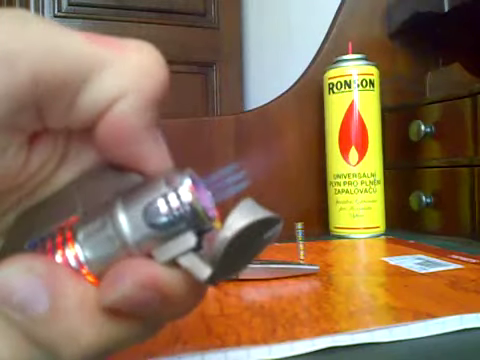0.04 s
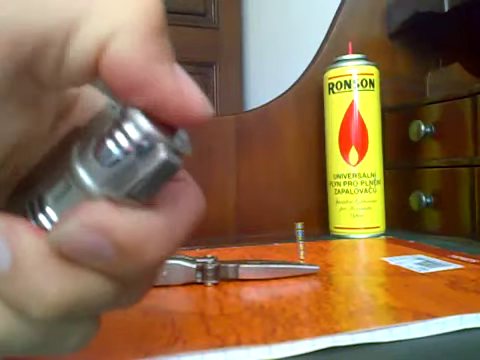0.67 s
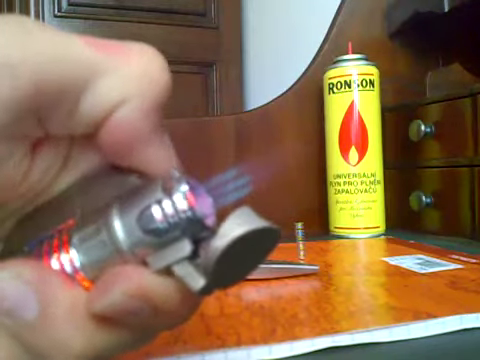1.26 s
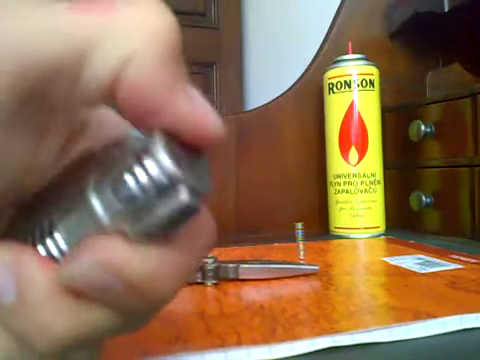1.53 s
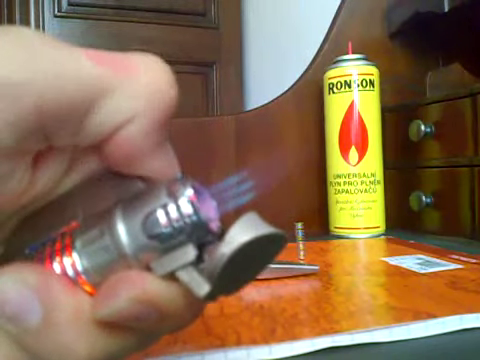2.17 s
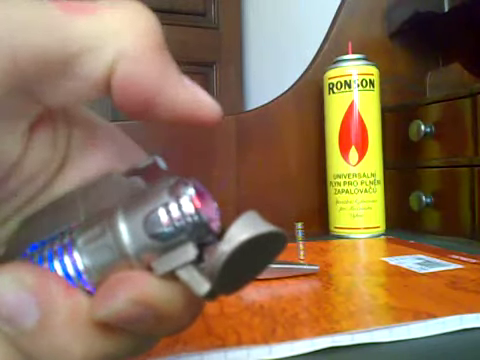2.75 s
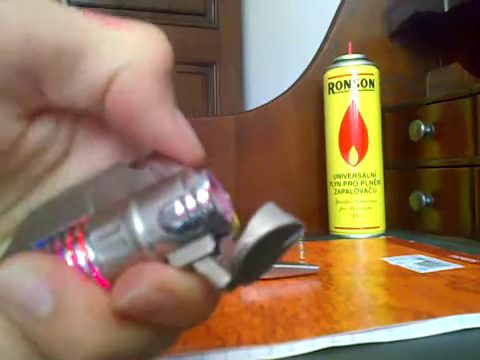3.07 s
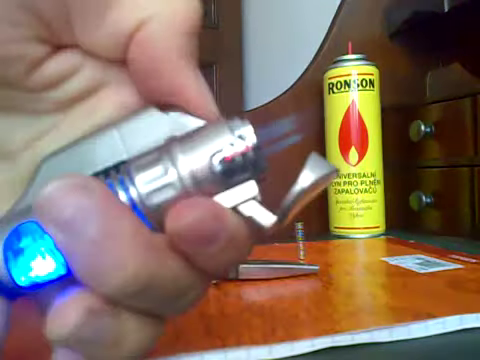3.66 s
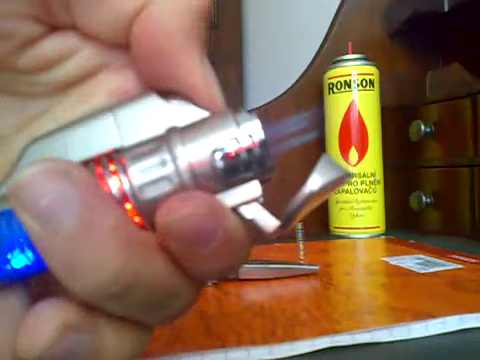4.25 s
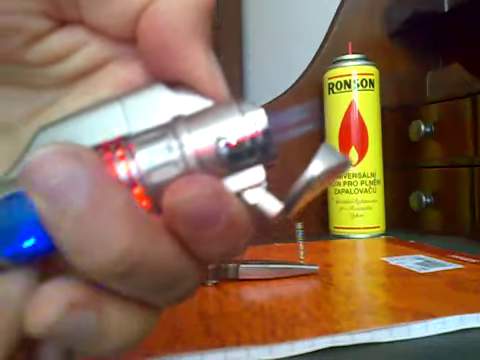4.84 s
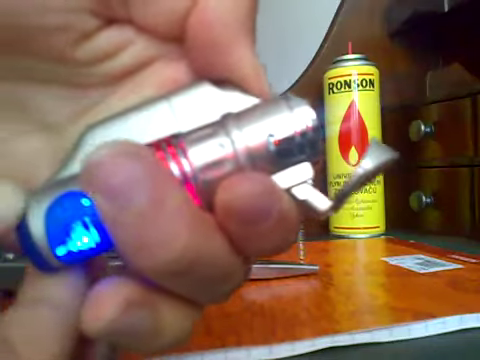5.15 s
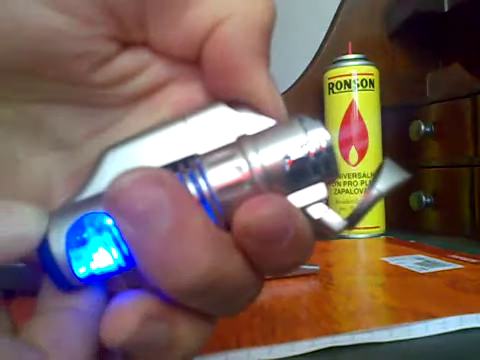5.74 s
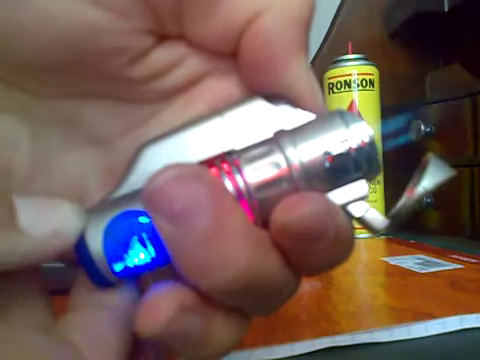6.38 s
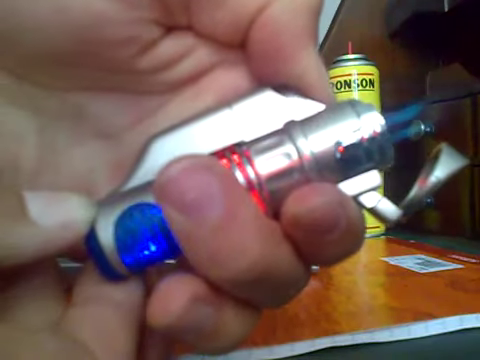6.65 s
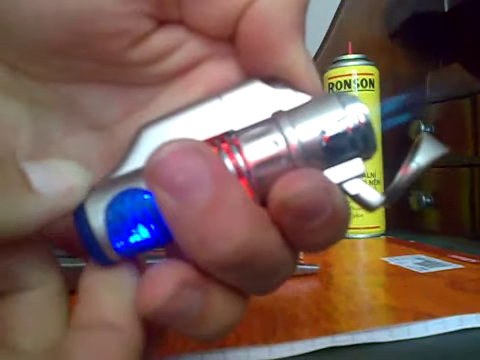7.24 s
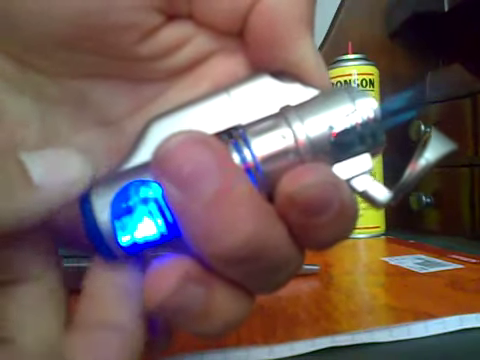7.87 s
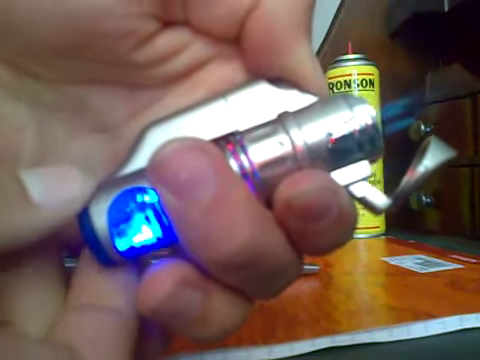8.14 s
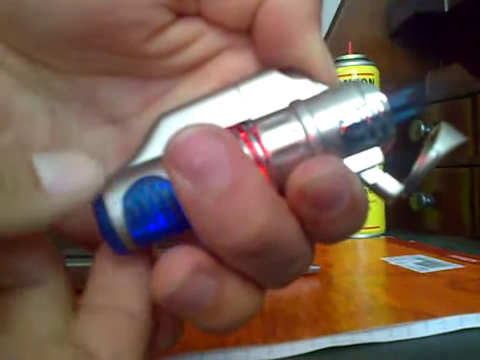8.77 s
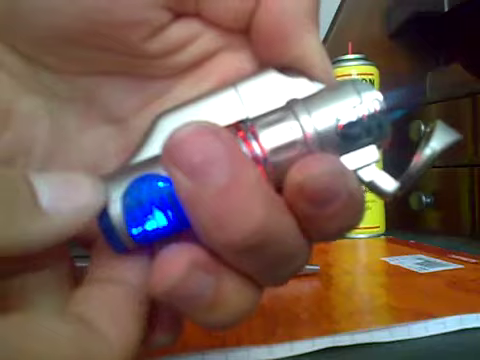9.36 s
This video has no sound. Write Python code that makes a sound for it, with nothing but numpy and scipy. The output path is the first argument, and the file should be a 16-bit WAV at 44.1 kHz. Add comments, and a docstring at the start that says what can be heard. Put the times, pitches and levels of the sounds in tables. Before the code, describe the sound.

A butane torch lighter is heard close up in a small, quiet room. At 0.2 seconds its metal cap snaps open, the igniter clicks, and the gas catches with a low pop. The jet roars and hisses for about half a second, dies with a click, and the cap slams shut near 0.9. A second burn runs from 1.2 to 1.6, with another sharp slam at 1.8. A third runs from 2.1 to 2.7 and ends with a click. Loud clicks briefly duck the other sounds. A hand knocks dully on the wooden desk, most clearly around 3.2. At 3.9 another click and pop start a long, hissier burn, loudest at first and then steady, slowly weakening until about 9.7 seconds. From about 5 seconds a soft draught buffets the microphone with a low rumble, growing near the end.

```python
"""A butane torch lighter at a wooden desk in a small room, one microphone close up.
The cap snaps open, the piezo clicks, the gas catches with a low pop and the jet roars and hisses for
half a second; the cap slams shut. This happens again, and after a third burn the cap stays open.
The hand knocks on the desk, then near 4 s the piezo fires and the jet burns on as a draught reaches
the microphone. Throughout, the recorder's gain ducks at loud clicks and slowly recovers."""
import sys
import numpy as np
from scipy import signal
from scipy.fft import rfft, irfft, next_fast_len
from scipy.io import wavfile
from scipy.ndimage import uniform_filter1d, map_coordinates

SR = 44100
rng = np.random.default_rng(int(sys.argv[2]) if len(sys.argv) > 2 else 0)


def inscribe(sig):
    """Save sig as 16-bit PCM at rate SR to the path in sys.argv[1].

    A 1-D sig is mono; a 2-D sig holds one channel per row.
    Samples are clipped to [-1, 1] before scaling.
    """
    pcm = np.round(np.clip(np.atleast_2d(sig).T, -1, 1) * 32767)
    wavfile.write(sys.argv[1], SR, pcm.astype(np.int16))


N = 423801

# each press of the trigger: valve opens t/s, gas catches t/s, valve shuts t/s, bleed time/s, pop gain/dB
BURNS = [(0.2, 0.241, 0.65, 0.12, -0.5), (1.152, 1.182, 1.555, 0.17, 0), (2.055, 2.092, 2.739, 0.16, 0),
         (3.808, 3.89, 9.7, 0.15, 5)]
# the jet at full flow, hissier in the long burn: t/s, roar level/dB, treble gain/dB, relative hiss/dB
JET_LEVELS = [(0.5, -12, -2.5, -35.5), (1.5, -8, -3, -38), (2.7, -10, -2.5, -35), (4.0, -6.5, 1, -24.5),
              (4.55, -13, -0.5, -32), (5.2, -14.4, 0, -29), (6.2, -15, 0.7, -28), (8.3, -16, 0.5, -30.5),
              (9.0, -18, -0.5, -33), (9.5, -21.5, -3.5, -38.5)]
# spectrum of the flame's roar: f/Hz, relative density/dB
ROAR_SPECTRUM = [(20, -22), (58, -0.5), (85, -11), (120, -8.5), (170, -15.5), (320, -11.5), (520, -8),
                 (700, -4.5), (1000, 0), (2000, -2.5), (2800, -8.5), (4000, -11.5), (5000, -15),
                 (5800, -23), (9000, -38)]
# desk and cabinet reflections reinforce and cancel parts of the roar: f/Hz, width/Hz, gain/dB
DESK_RIPPLES = [(188.3, 3.2, 11.5), (330, 19, -9), (361, 84, 3.5), (480.4, 13.3, -11), (596, 16, -4.5),
                (672, 52, 4.5), (874.5, 11.7, 5), (1175, 20, -11), (1278.5, 47, -14.5), (1455, 33, -5.5),
                (1517, 14, 5), (1907, 41.5, -10.5), (2053, 6.5, 8), (2326, 26, -14), (2522, 80, 4.5),
                (2680, 22, -14.5), (2855, 64, 5), (3254, 57, -3), (3312, 40, 9), (3800, 46, 2),
                (3710, 37, 2), (4410, 120, 2.5), (4880, 23, -10), (5590, 70, -12), (6342, 70, -25.5),
                (6415, 78, 15.5)]
# spectrum of the escaping gas: f/Hz, relative density/dB
HISS_SPECTRUM = [(300, -9), (1000, -10), (3500, 4.5), (6000, -9), (8000, -2.5), (9200, 0), (10300, 0),
                 (13000, 2), (15600, -2)]
# peaks and notches in the nozzle's hiss: f/Hz, width/Hz, gain/dB
NOZZLE_RIPPLES = [(7160, 100, -10), (7830, 97, -5), (7950, 100, 4.5), (9350, 180, 3.5), (9630, 110, -5),
                  (10670, 330, -2), (12100, 200, -1.5), (14900, 320, 8)]

# metal contacts, by part of the lighter (slams include bounces): t/s, level/dB, chatter length/s
HINGE_SNAPS = [(0.201, 7, 0.004), (0.841, 7.5, 0.0025), (1.159, 17, 0.0024), (1.77, 13, 0.0019),
               (2.070, 15, 0.0043)]
PIEZO_STRIKES = [(.2363, 11.5, 0.0052), (1.175, 15.5, 0.0039), (2.086, 12.5, 0.0047), (3.8873, 9.5, 0.007)]
CAP_SLAMS = [(0.858, 10, 0.0017), (0.8625, 17.5, 0.0038), (0.8731, 10, 0.0039), (.881, 9, .003),
             (1.793, 21, 0.0018)]
TRIGGER_RETURNS = [(.641, 6, 0.0019), (1.567, 8.5, 0.0028), (2.7365, 2.3, 0.0041), (2.7455, -16, 0.0029)]
LINKAGE_TICKS = [(.160, -18.5, 0.0027), (.174, -36, .002), (1.006, -12, 0.002), (1.1134, 0.5, 0.001),
                 (1.9315, -12.5, 0.0038), (2.0188, -12.5, 0.0012), (2.0505, -13, 0.0027),
                 (3.425, -40, .003)]
# resonances of the same parts: f/Hz, width/Hz, relative level/dB
HINGE_MODES = [(833, 418, -15.0), (2210, 293, -12.3), (2883, 373, -10.9), (5050, 500, -9),
               (5754, 440, -7.5), (7197, 750, -11.9), (9096, 695, -13.8), (11500, 1353, -13.7),
               (12800, 477, -10.1), (14652, 231, 0.0)]
PIEZO_MODES = [(650, 450, -6), (2539, 270, -3.5), (3014, 189, 2.5), (4927, 864, -10.7), (5798, 402, -5.1),
               (7072, 675, -8.1), (9057, 467, -2.1), (11600, 1480, -7.5), (12450, 251, -0.8),
               (13626, 930, -5.6), (15600, 457, -10.6)]
CAP_MODES = [(735, 207, -21), (1823, 354, -13.7), (2931, 275, -15.4), (5100, 1480, -13.5),
             (6500, 896, -16.0), (8934, 1319, -15.8), (10671, 996, -13.6), (12747, 1364, -14.2),
             (14779, 361, -7.3), (15661, 148, 0.0)]
TRIGGER_MODES = [(800, 548, -12.6), (2500, 1248, -7.5), (3865, 976, -7.6), (4717, 186, 0.0),
                 (5800, 526, -8.0), (7485, 1480, -10.1), (10900, 1316, -12.6), (12510, 436, -7.3),
                 (14100, 681, -5.3), (15630, 508, -2.5)]
LINKAGE_MODES = [(1700, 160, -13.5), (2800, 1030, -2), (3050, 1000, -2), (4500, 660, -11.5),
                 (6360, 1500, -20.5), (12800, 3600, -29)]
# what the whole metal case sends into the room: f/Hz, gain/dB
CASE_RADIATION = [(150, 1), (700, -14.5), (1800, -4), (3000, -2), (5500, -1.5), (7800, -2.5), (9500, 1),
                  (13000, 4), (16000, 2)]

# the hand bumps the desk: t/s, thump gain/dB, rattle level/dB, contact time/s
KNOCKS = [(1.969, -17, -52, 0.0061), (2.738, -14.5, -56, 0.012), (3.125, -16.5, -58, 0.0084),
          (3.2136, -18, -6, 0.0022), (3.2185, -8.5, -13, 0.0022), (3.399, -23, -59, 0.011),
          (3.48, -32, -59, 0.012), (3.755, -32, -47, 0.0087)]
# the desk's low ringing modes: f/Hz, level/dB, t60/s
DESK_MODES = [(49.5, 2, 0.42), (111, 7.5, 0.1), (161, -2.5, 0.27), (245, -9.5, 0.37), (410, -6, 0.26)]
# its damped upper resonances: f/Hz, width/Hz, relative level/dB
DESK_RATTLE = [(428, 49, 9), (708, 125, -0.5), (926, 30, -2), (1140, 130, -3.5), (1400, 90, -6),
               (1880, 210, -10), (2700, 320, -13.5), (3400, 870, -21), (8000, 8500, -34)]
# swells of the low rumble: middle t/s, level/dB, half-length/s
RUMBLE_SWELLS = [(0.4, -35, 0.092), (1.347, -26, 0.17), (2.1, -27, 0.12), (4.144, -28, 0.19),
                 (7.3, -29, 0.18), (8.616, -30, 0.17), (9.2, -38, 0.18)]
# spectrum of the low rumble: f/Hz, relative density/dB
RUMBLE_SPECTRUM = [(12, -33), (30, -17), (52, 7.5), (80, -11), (120, -6), (170, -19), (300, -20),
                   (800, -41.5)]

# low modes of the room: f/Hz, level/dB, t60/s
ROOM_MODES = [(59, -12, 1.63), (120.5, 0.5, 0.38), (154, -5, 0.17), (194.4, -4.5, 0.41), (222, -8, 0.16),
              (268, -15.5, 0.4), (403, -27.5, 0.36)]
# decay of the room's tail: f/Hz, t60/s
ROOM_DECAY = [(200, 0.18), (2000, 0.23), (6000, 0.22), (15000, 0.14)]
# the draught at the microphone: t/s, level/dB
DRAUGHT_LEVELS = [(3.8, -58), (5.2, -32), (7.2, -31.5), (8.7, -36.5), (9.6, -23)]
# spectrum of its buffeting: f/Hz, relative density/dB
DRAUGHT_SPECTRUM = [(20, -2), (60, -3), (115, 3), (200, -12.5), (400, -8), (800, -23), (2000, -57)]
# room tone and microphone noise: f/Hz, relative density/dB
FLOOR_SPECTRUM = [(20, 3), (60, 7), (130, 4), (250, 5.5), (400, 3), (700, 2), (1600, -0.3), (4000, -2),
                  (6000, -5), (8500, -7.5), (11500, -5), (15500, -4.5)]

OPEN_S, CATCH_S = 0.055, 0.031  # the gas comes up to full flow; the flame takes hold
BLEED_DB, BLEED_POWER = 22, 2.86  # valve shut: the flow falls ever faster, this far in the bleed time
TREBLE_PER_FLOW, HISS_PER_FLOW = 0.9, 1.3  # dB of brightness and of hiss lost with each dB of flow
AGC_THRESHOLD_DB, AGC_SHARE = -26.1, 0.728  # the gain is cut by this share of the excess level
AGC_AVERAGE_S, AGC_ATTACK_S = 0.18, 0.012
AGC_RECOVERY_DB_PER_S, AGC_START_CUT_DB = 15.5, 14
AGC_LOW_CUT_HZ = 590  # thumps and rumble hardly move the gain
BAND_LIMIT_HZ = 15800


def flame(lit, flow_db, split_hz=2900, flutter_db=0.35):
    """Turbulent burning, heard close over the desk: the roar flutters and dulls as the flow dies."""
    level_db, bright_db, _ = curves(JET_LEVELS)
    roar = drift(noise(ROAR_SPECTRUM, DESK_RIPPLES), depth_db=0.4)
    treble = filtered(roar, lambda f: 1 - 1 / (1 + (f / split_hz) ** 9))
    treble_gain = amp(bright_db + TREBLE_PER_FLOW * flow_db)
    envelope = lit * amp(level_db + flow_db + flutter_db * wobble(22))
    return envelope * (roar + (treble_gain - 1) * treble)


def gas_hiss(opened, flow_db, flutter_db=0.8, trim_db=-2.0):
    """Gas leaves the nozzle with a fine hiss, with or without a flame."""
    _, _, level_db = curves(JET_LEVELS)
    envelope = opened * amp(level_db + HISS_PER_FLOW * flow_db + trim_db + flutter_db * wobble(17))
    return envelope * drift(noise(HISS_SPECTRUM, NOZZLE_RIPPLES), depth_db=2.2)


def valve():
    """The valve opens (0-1), the flame catches (0-1), and after each burn the flow (dB) bleeds away."""
    t = np.arange(N) / SR
    opened, lit, flow_db = np.zeros((3, N))
    for opens, catches, shuts, bleed, _ in BURNS:
        now = t >= opens
        opened[now] = np.clip((t[now] - opens) / OPEN_S, 0, 1)
        lit[now] = np.clip((t[now] - catches) / CATCH_S, 0, 1)
        flow_db[now] = -BLEED_DB * np.clip((t[now] - shuts) / bleed, 0, 2) ** BLEED_POWER
    return opened, lit, flow_db


def ignition_pops(push_db=6, push_s=0.0018):
    """Igniting gas gives one low push of air, and the room booms."""
    track, t = np.zeros(N), np.arange(SR) / SR
    u = t / push_s
    push = -np.e * u * (2 - u) * np.exp(-u)
    pop = amp(push_db) * push - ring(ROOM_MODES, t, attack_s=0.00028)
    for _, catches, _, _, db in BURNS:
        add(track, catches, amp(db) * pop)
    return track


def clicks(contacts, resonances, t60, room_db):
    """Each contact rings the part facing the microphone; its energy fills the room with an even tail."""
    track = np.zeros(N)
    for s, db, length_s in contacts:
        contact = chatter(db, length_s, t60)
        blow = np.linalg.norm(contact) * signal.unit_impulse(len(contact), round(length_s * SR / 2))
        tail = filtered(room_tail(blow), lambda f: amp(along(CASE_RADIATION, f)))
        direct = filtered(contact, body(resonances))
        add(track, s, direct + amp(room_db) * tail)
    return track


def chatter(db, length_s, t60):
    """Two parts chatter against each other for a few milliseconds, then settle."""
    t = np.arange(SR // 2) / SR
    return rng.standard_normal(len(t)) * amp(db - 60 * np.maximum(t - length_s, 0) / t60)


def snap_lead_in(relative_db=-26, rise_s=0.013):
    """A faint, brief rush of noise swells into each hinge snap."""
    track, t = np.zeros(N), np.arange(SR // 20) / SR
    for s, snap_db, _ in HINGE_SNAPS:
        swell = rng.standard_normal(len(t)) * np.exp((t - t[-1]) / rise_s)
        rush = filtered(swell, body(LINKAGE_MODES + TRIGGER_MODES))
        add(track, s - t[-1], amp(snap_db + relative_db) * rush)
    return track


def cap_spring(hz=1950, width_hz=450, relative_db=-30.0, t60=0.47):
    """The cap's spring buzzes on after each slam."""
    track, t = np.zeros(N), np.arange(SR // 2) / SR
    for s, slam_db, _ in CAP_SLAMS:
        buzz = filtered(rng.standard_normal(len(t)), body([(hz, width_hz, 0)]))
        add(track, s, unit(buzz) * amp(slam_db + relative_db - 60 * t / t60))
    return track


def desk_knocks(room_db=-5):
    """The hand bumps the wooden desk: a dull thump with a short rattle on top."""
    track, t = np.zeros(N), np.arange(SR // 2) / SR
    wood = ring(DESK_MODES, t, attack_s=0.00086)
    for s, thump_db, rattle_db, touch_s in KNOCKS:
        force = np.hanning(round(touch_s * SR))  # a longer, softer touch rings only the lowest modes
        thump = signal.fftconvolve(wood, force / force.sum())[:len(t)]
        rattle = filtered(chatter(rattle_db, length_s=0.002, t60=0.016), body(DESK_RATTLE))
        add(track, s, amp(thump_db) * thump + rattle + amp(room_db) * room_tail(rattle))
    return track


def low_rumble(resting_db=-38, lumps_db=3):
    """A low, uneven rumble swells as each burn starts, and now and then in the long burn."""
    t = np.arange(N) / SR
    swells = sum(amp(db) * np.exp(-((t - s) / width) ** 2) for s, db, width in RUMBLE_SWELLS)
    return (amp(resting_db) + swells) * amp(lumps_db * wobble(8.4)) * noise(RUMBLE_SPECTRUM)


def draught(lumps_db=1.0):
    """Moving air buffets the microphone in soft, low lumps."""
    level_db, = curves(DRAUGHT_LEVELS)
    return amp(level_db + lumps_db * wobble(12)) * noise(DRAUGHT_SPECTRUM)


def room_tail(x, build_s=0.004):
    """The small room answers x with a short diffuse tail; the top treble dies first."""
    hz, t, spectra = signal.stft(rng.standard_normal(SR // 2), SR, nperseg=256)
    decay = amp(-60 * t / along(ROOM_DECAY, hz)[:, None])
    tail = signal.istft(spectra * decay, SR, nperseg=256)[1]
    tail *= 1 - np.exp(-(np.arange(len(tail)) / SR / build_s) ** 2)  # reflections take time to arrive
    return signal.fftconvolve(x, tail / np.linalg.norm(tail))[:len(x)]


def room_tone(db=-40.0):
    """The faint, steady noise of the room and the microphone."""
    return amp(db) * noise(FLOOR_SPECTRUM)


def gain_control(x):
    """Loud clicks turn the recorder down; it creeps back, so flame and room tone swell after each."""
    sensed = signal.lfilter(*signal.butter(2, AGC_LOW_CUT_HZ, 'highpass', fs=SR), x)
    level_db = 10 * np.log10(lag(sensed ** 2, AGC_AVERAGE_S) + 1e-12)
    wanted_db = AGC_SHARE * np.maximum(level_db - AGC_THRESHOLD_DB, 0)
    recovered_db = AGC_RECOVERY_DB_PER_S * np.arange(N) / SR
    held_db = np.maximum.accumulate(np.maximum(wanted_db + recovered_db, AGC_START_CUT_DB))
    cut_db = held_db - recovered_db
    return x * amp(-AGC_START_CUT_DB - lag(cut_db - AGC_START_CUT_DB, AGC_ATTACK_S))


def drift(x, depth_db, band_count=7, frame_count=60):
    """The colour of a sound shifts slowly as its source sways in the hand."""
    spectra = signal.stft(x, nperseg=1024)[2]
    field = rng.standard_normal(spectra.shape)
    for axis, size in enumerate((band_count, frame_count)):
        field = uniform_filter1d(uniform_filter1d(field, size, axis), size, axis)
    return unit(signal.istft(spectra * amp(depth_db * unit(field)), nperseg=1024)[1][:N])


def noise(spectrum, ripples=()):
    """Noise of rms 1 with a smooth spectrum plus narrow peaks and notches."""
    def response(f):
        ripple_db = sum(db * np.exp(-.5 * ((f - hz) / width) ** 2) for hz, width, db in ripples)
        return amp(along(spectrum, f) + ripple_db)
    return unit(filtered(rng.standard_normal(N), response))


def body(resonances):
    """The causal response of resonances of alternating sign, with unit power gain."""
    def response(f):
        h = sum((-1) ** k * amp(db) * 1j * f * width / (hz * hz - f * f + 1j * f * width)
                for k, (hz, width, db) in enumerate(resonances))
        return h / np.sqrt(np.mean(np.abs(h) ** 2))
    return response


def ring(modes, t, attack_s):
    """Decaying modes after one blow."""
    ringing = sum(amp(db - 60 * t / t60) * np.sin(2 * np.pi * hz * t) for hz, db, t60 in modes)
    return (1 - np.exp(-t / attack_s)) * ringing


def filtered(x, response):
    """x through a response given as a function of frequency."""
    size = next_fast_len(len(x) + 8192)
    return irfft(rfft(x, size) * response(np.fft.rfftfreq(size, 1 / SR)), size)[:len(x)]


def wobble(rate):
    """A smooth random curve with rate knots a second."""
    return map_coordinates(rng.standard_normal(int(N * rate / SR) + 4), [np.arange(N) * rate / SR])


def lag(x, seconds):
    """A running average that forgets with the given time constant."""
    keep = np.exp(-1 / (seconds * SR))
    return signal.lfilter([1 - keep], [1, -keep], x)


def curves(rows):
    """One value per sample for each column after the time."""
    times, *columns = np.transpose(rows)
    return [np.interp(np.arange(N) / SR, times, column) for column in columns]


def along(points, hz):
    """Read (f/Hz, value) points on a log frequency axis."""
    f, values = np.transpose(points)
    return np.interp(np.log(hz + 1), np.log(f + 1), values)


def add(track, s, sound):
    """Mix a sound into the track at s seconds."""
    start = round(s * SR)
    track[start:start + len(sound)] += sound[:N - start]


def amp(db):
    """Decibels to gain."""
    return 10 ** (np.asarray(db) / 20)


def unit(x):
    """Scale to rms 1."""
    return x / np.sqrt(np.mean(x ** 2) + 1e-20)


def scene():
    """At the microphone, in mono: lighter and desk close up, the quiet room behind."""
    opened, lit, flow_db = valve()
    jet = flame(lit, flow_db) + gas_hiss(opened, flow_db)
    metal = (clicks(HINGE_SNAPS, HINGE_MODES, t60=0.012, room_db=-8.5)
             + clicks(PIEZO_STRIKES, PIEZO_MODES, t60=0.0055, room_db=-1.5)
             + clicks(CAP_SLAMS, CAP_MODES, t60=0.016, room_db=-10)
             + clicks(TRIGGER_RETURNS, TRIGGER_MODES, t60=0.016, room_db=-11.5)
             + clicks(LINKAGE_TICKS, LINKAGE_MODES, t60=0.03, room_db=-21.5))
    lighter = jet + ignition_pops() + metal + snap_lead_in() + cap_spring()
    return (lighter + low_rumble() + desk_knocks() + draught() + room_tone())[None]


def record(dry):
    """The recorder rides the gain, clips the loudest clicks and cuts off steeply at its band limit."""
    clipped = np.clip(gain_control(dry[0]), -1, 1)
    return filtered(clipped, lambda f: 1 / np.sqrt(1 + (f / BAND_LIMIT_HZ) ** 400))[None]


dry = scene()
out = record(dry)
inscribe(out)
```